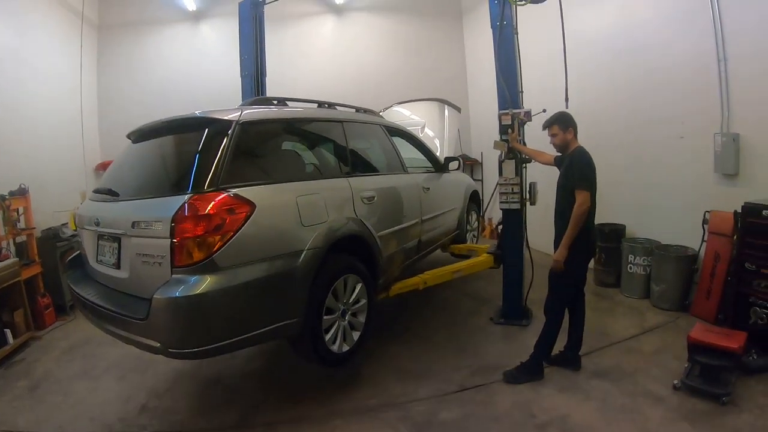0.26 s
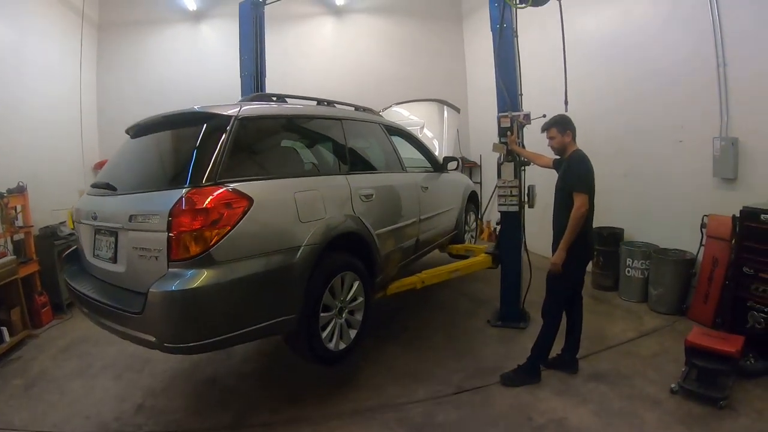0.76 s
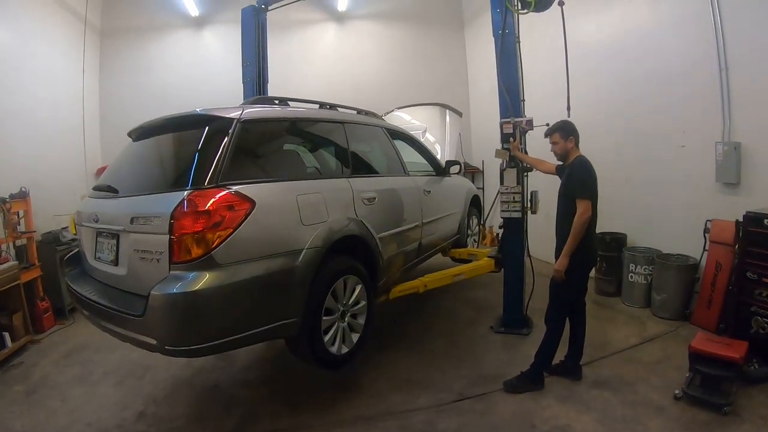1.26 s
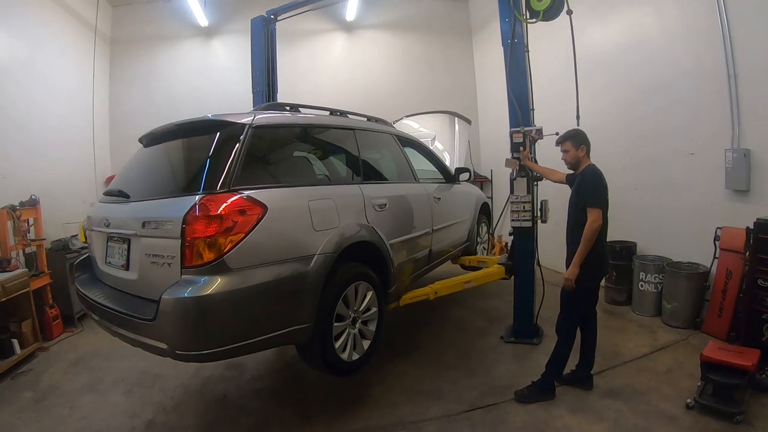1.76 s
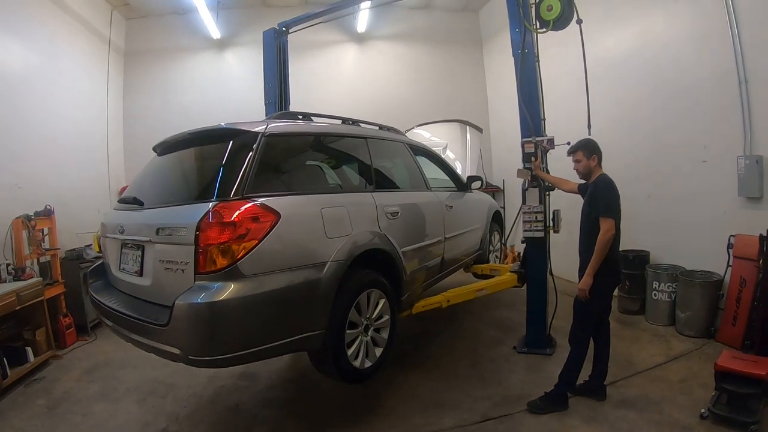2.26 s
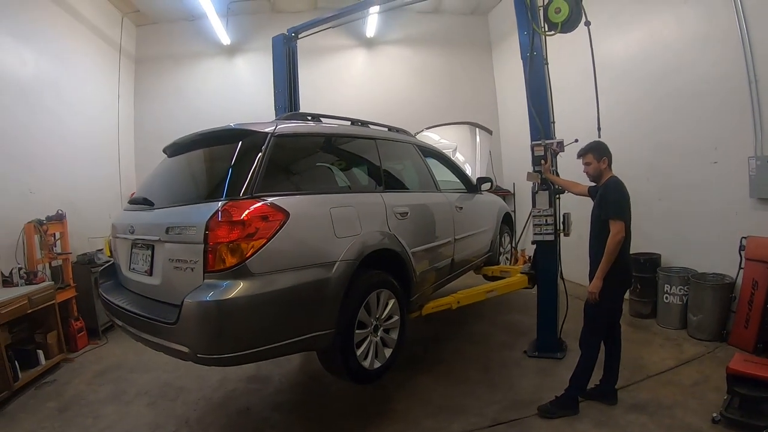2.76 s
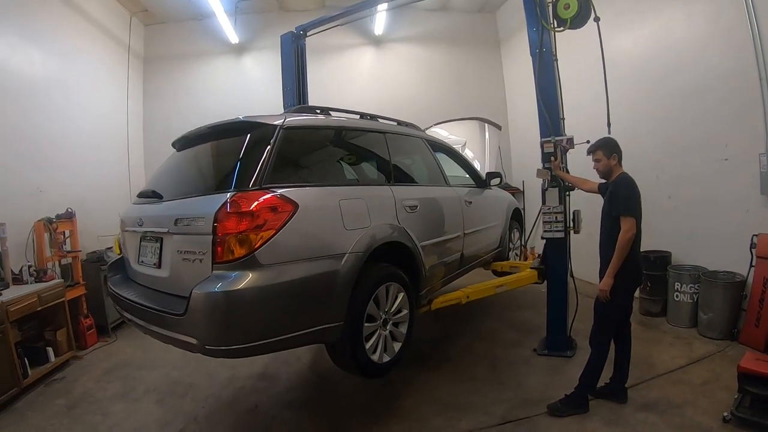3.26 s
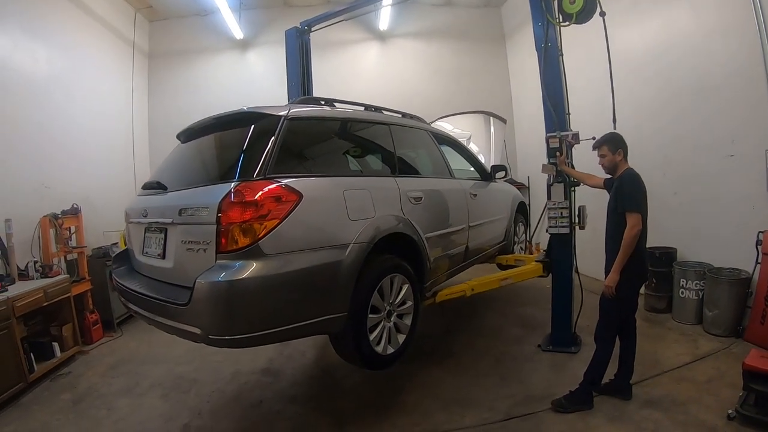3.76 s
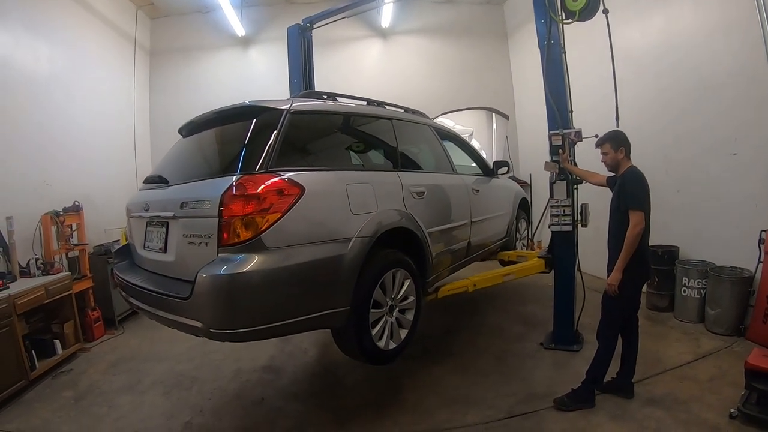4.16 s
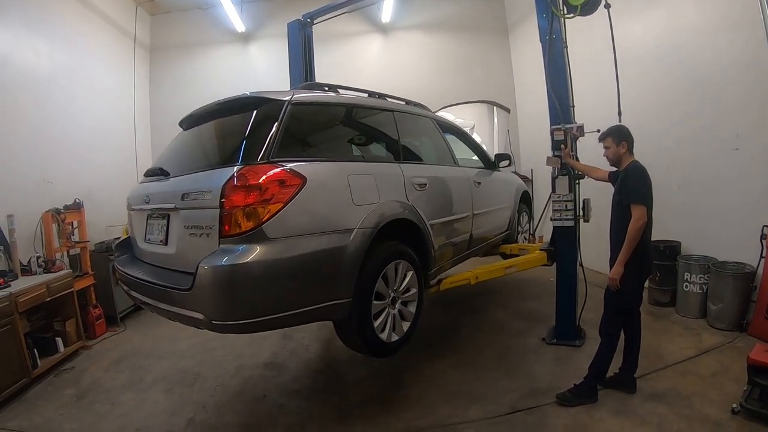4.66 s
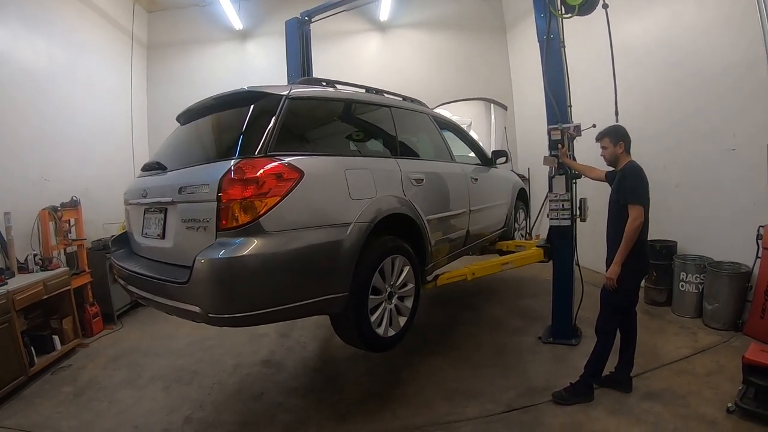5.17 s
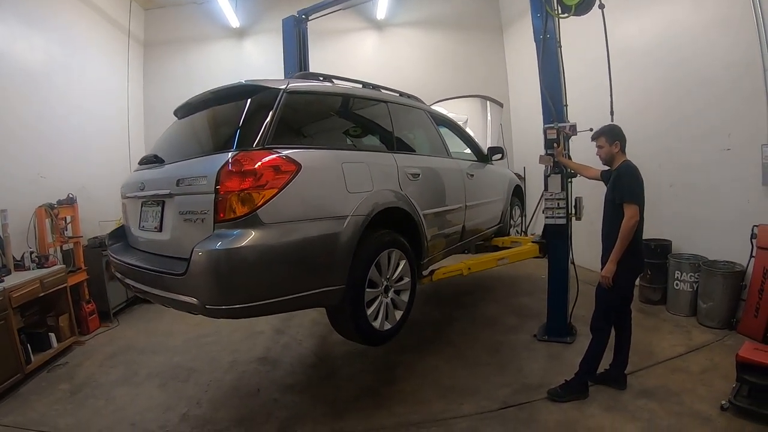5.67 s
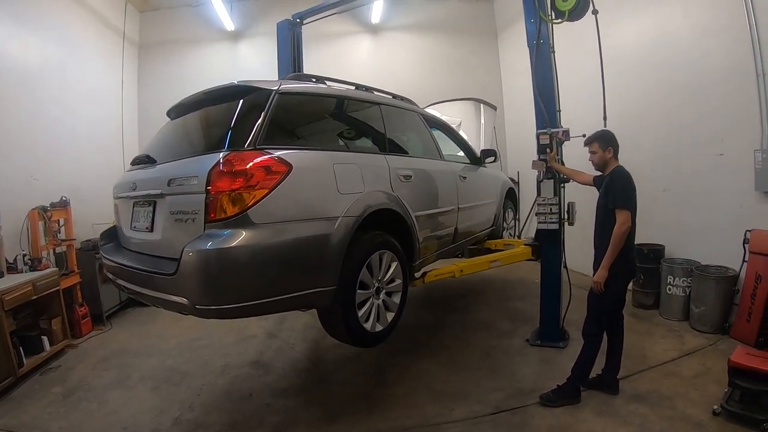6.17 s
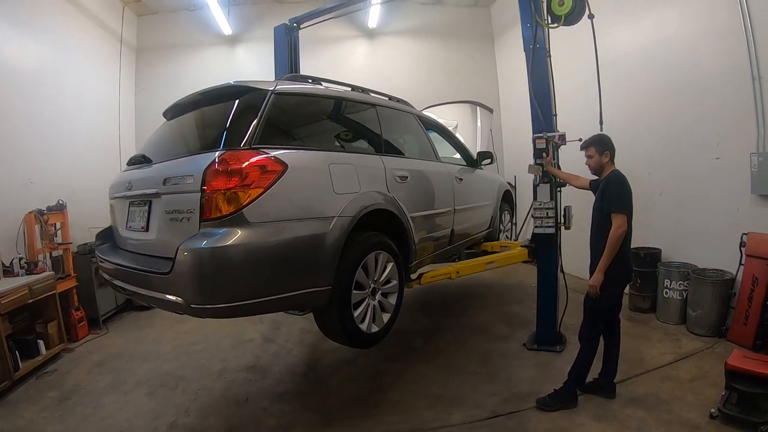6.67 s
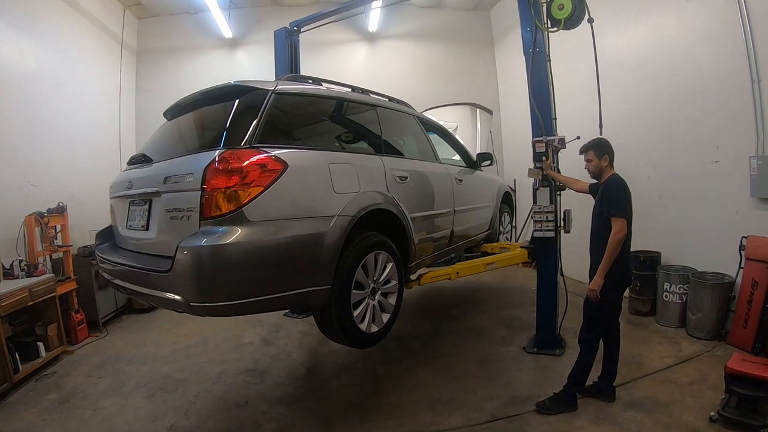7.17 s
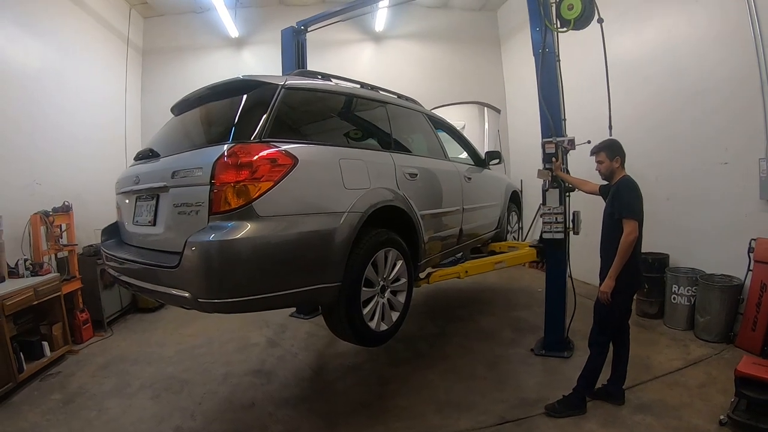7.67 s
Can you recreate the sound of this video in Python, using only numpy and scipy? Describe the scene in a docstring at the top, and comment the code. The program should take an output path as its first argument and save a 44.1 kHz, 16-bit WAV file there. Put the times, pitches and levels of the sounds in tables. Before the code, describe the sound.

Steady motor hum, buzzing gear whine and oil hiss, broken four times by loud double metallic clanks ringing in a bare room.

```python
"""In a small, hard-walled garage a two-post lift raises a car.
The motor hums in pure tones over a rumble; its 13-tooth gear pump whines and buzzes, over hissing oil.
About every 2.3 s the safety latches drop into the next notch: noise bursts and ringing tones make the clang.
The microphone is carried slowly through the room's standing waves, so the tones change in level.
Its gain control turns the sound down after every clang and then lets it creep back."""
import sys
import numpy as np
from scipy import signal
from scipy.fft import rfft, irfft, next_fast_len
from scipy.io import wavfile
from scipy.ndimage import uniform_filter1d, minimum_filter1d, map_coordinates

SR = 44100
rng = np.random.default_rng(int(sys.argv[2]) if len(sys.argv) > 2 else 0)


def master_out(mix):
    """Clip the mix to full scale and print it as 16-bit PCM to the path in sys.argv[1]."""
    frames = np.transpose(np.atleast_2d(mix))
    ceiling = np.clip(frames, -1, 1)
    pcm = np.round(ceiling * 32767).astype(np.int16)
    wavfile.write(sys.argv[1], SR, pcm)


N = 349253
TIME = np.arange(N) / SR

SHAFT_HZ, MAINS_HZ = 58.235, 59.96
TEETH = 13
CUTOFF_HZ = 15600   # the buzz has no lines above this

# how alike left and right are, from 1 (the same) to -1 (opposite): [f/Hz, correlation]
LIKENESS = [(30, 0.43), (70, .85), (120, 1), (380, .95), (700, 0.4), (1300, 0.17), (2400, 0.71),
            (4400, 0.53), (8000, -0.26), (15000, 0.14)]
# weaker tones of the meshing teeth, before they fade and flutter:
# [multiple of the tooth rate, level/dB at the first spot, level/dB at the second spot]
WHINE = [(4, -54, -56.5), (5, -53, -49.5), (6, -56.5, -53.5), (7, -61, -56)]


def from_db(db):
    """Turn decibels into a gain."""
    return 10 ** (np.asarray(db) / 20)


def in_time(rows, s=TIME):
    """Read each column of a curve at the times s."""
    at, *columns = np.transpose(rows)
    return [np.interp(s, at, column) for column in columns]


def at_hz(points, hz, axis=1):
    """Read one column of a spectrum on a log-frequency axis."""
    points = np.array(points, float)
    return np.interp(np.log(np.maximum(hz, 1)), np.log(points[:, 0]), points[:, axis])


def on_the_walk(first_db, second_db):
    """Change a level as the microphone is carried from the first spot to the second."""
    # progress of the walk: [t/s, share of the way]
    walk = [(1.0, 0.02), (3.3, 1)]
    way, = in_time(walk)
    return first_db + (second_db - first_db) * way


def drift(rate, count=1):
    """Slow random curves of spread 1, a point every 10 ms; a higher rate (Hz) wanders faster."""
    r = np.exp(-2 * np.pi * rate / 100)
    white = rng.standard_normal((count, N * 100 // SR + 602))
    slow = signal.lfilter([1], [1, -2 * r, r * r], white)[:, 600:]   # drop the filter's start
    return slow / np.std(slow)


def smooth(points):
    """Stretch a slow curve over every sample."""
    return np.interp(np.linspace(0, len(points) - 1, N), np.arange(len(points)), points)


def pair(mid, side, hz):
    """Make left and right from two unrelated parts, as alike as the room makes them at hz."""
    alike = np.clip(at_hz(LIKENESS, hz), -.99, .995)
    mid = np.sqrt((1 + alike) / 2) * mid
    side = np.sqrt((1 - alike) / 2) * side
    return np.array([mid + side, mid - side])


def noise(spectrum, size=N):
    """Stereo noise shaped by a spectrum in dB per Hz."""
    padded = next_fast_len(size, True)
    hz = np.fft.rfftfreq(padded, 1 / SR)
    white = rfft(rng.standard_normal((2, padded))) * np.sqrt(SR / 2)
    return irfft(pair(*white, hz) * from_db(at_hz(spectrum, hz)), padded)[:, :size]


def band(low, high, size):
    """Stereo noise of average strength (rms) 1 between two frequencies."""
    bandpass = signal.butter(3, [low, min(high, .45 * SR)], "band", fs=SR, output="sos")
    x = signal.sosfilt(bandpass, rng.standard_normal((2, size + 4000)))
    return pair(*(x / np.std(x))[:, -size:], np.sqrt(low * high))


def dying(t, t60):
    """A decay of 60 dB in t60 seconds."""
    return np.exp(-np.log(1000) * t / t60)


def add(out, s, sound):
    """Mix a sound in at time s."""
    start = max(round(s * SR), 0)
    out[:, start:start + sound.shape[1]] += sound[:, :N - start]


def placed(x, right_db):
    """Shift a source to the right by making the right channel right_db louder than the left."""
    return x * from_db(np.array([[-right_db], [right_db]]) / 2)


def room_paths(hz, direct, rate):
    """Gain of steady tones: a fixed part plus reflections that shift as the microphone moves."""
    # complex numbers hold strength and phase: (channel, line, time)
    parts = drift(rate, count=4 * len(hz)).reshape(2, 2, len(hz), -1)
    reflected = pair(*(parts[0] + 1j * parts[1]) / np.sqrt(2), hz[:, None])
    apart = np.arccos(np.clip(at_hz(LIKENESS, hz), -1, 1)) / 2   # phase offset of each channel
    steady = np.exp(1j * (2 * np.pi * rng.random(len(hz)) + np.array([apart, -apart])))
    direct = np.clip(direct, 0, 1)   # share of the power in the fixed part
    return np.sqrt(direct) * steady[:, :, None] + np.sqrt(1 - direct) * reflected


def tone(hz, cycles, direct, rate):
    """One tone of average strength (rms) about 1 as it arrives through the room."""
    path = np.array([smooth(side[0]) for side in room_paths(np.array([hz]), direct, rate)])
    return np.sqrt(2) * np.real(path * np.exp(2j * np.pi * cycles))


def motor(fade_db=2.0, rumble_follows=0.71):
    """Magnetic hum at twice the mains rate, with slowly fading overtones, over a rumble that follows it."""
    # the hum in the room's standing wave, before placing: [t/s, level/dB]
    hum_curve = [(0, -31), (1, -31.5), (2, -34), (5.6, -36), (7, -29.7), (7.9, -31)]
    # overtones, before they fade: [multiple of the hum, level/dB at first spot, level/dB at second spot]
    hum_overtones = [(2, -48, -61), (3, -61, -53.5), (4, -50.5, -55.5), (5, -48.5, -54.5)]
    # low rumble of the running machine, before its level moves: [f/Hz, level/(dB per Hz)]
    rumble_spectrum = [(20, -89), (35, -94), (55, -69), (72, -67), (100, -70), (160, -84.5), (400, -130)]

    hum_db, = in_time(hum_curve)
    hz = 2 * MAINS_HZ
    hum = from_db(hum_db) * np.sqrt(2) * np.sin(2 * np.pi * hz * TIME)
    rumble_db = on_the_walk(4, -1) + rumble_follows * (hum_db - hum_db.mean())
    out = hum + from_db(rumble_db) * noise(rumble_spectrum)
    for k, first_db, second_db in hum_overtones:
        level_db = on_the_walk(first_db, second_db) + fade_db * smooth(drift(0.65)[0])
        out += from_db(level_db) * tone(k * hz, k * hz * TIME, direct=1.0, rate=1.0)
    return out


def gear_whine(turns, flutter_db=1.0, fade_db=1.8, throb=0.074):
    """Tones of the meshing teeth swell in the room, flutter with oil pressure and throb with torque."""
    # whine at once, twice and three times the tooth rate, before flutter: [t/s, level/dB]
    tooth_curve = [(0, -50), (3.7, -56.5), (4.7, -44), (6.7, -53.5), (7.9, -43)]
    lower_curve = [(0, -49), (1.3, -45), (2, -54), (3.3, -42), (4.15, -45.5), (4.5, -50), (5.9, -51.5),
                   (6.6, -45.5), (7.9, -44)]   # a fifth below the main whine
    main_curve = [(0, -39.5), (1, -41), (1.8, -39.5), (2.3, -47.5), (3.3, -35.5), (4.4, -36), (5.4, -40),
                  (6.25, -34.5), (6.9, -45), (7.9, -47)]

    curves = (tooth_curve, lower_curve, main_curve)
    levels = {k: in_time(curve)[0] for k, curve in enumerate(curves, 1)}
    for k, first_db, second_db in WHINE:
        levels[k] = on_the_walk(first_db, second_db) + fade_db * smooth(drift(1.0)[0])
    out = 0
    for k, level_db in levels.items():
        gain = from_db(level_db + flutter_db * smooth(drift(3)[0]))
        out = out + gain * tone(k * TEETH * SHAFT_HZ, k * TEETH * turns, direct=0.98, rate=0.29)
    return out * (1 + throb * np.cos(2 * np.pi * 2 * MAINS_HZ * TIME))


def pump_buzz(turns, size=4096, count=80):
    """No two teeth are alike, so every multiple of the shaft rate sounds, coloured by the housing."""
    # lines of the shaft rate away from any resonance: [f/Hz, level/dB]
    buzz_levels = [(58, -57), (116, -60), (175, -56.5), (400, -67), (1100, -92), (1800, -103), (3000, -78),
                   (4700, -83), (7000, -86), (9500, -65.5), (10500, -74), (11500, -124), (14500, -80),
                   (15500, -105)]
    # resonances of pump housing and oil tank: [f/Hz, width/Hz, level/dB]
    housing = [(290, 70, -67), (669, 69, -52), (799, 38, -54), (2255, 220, -50.5), (3660, 38, -53),
               (5400, 77, -55.5), (6200, 110, -48.5), (6670, 420, -51), (7570, 730, -55), (8380, 270, -54),
               (9000, 240, -59), (9660, 103, -56.5)]
    # higher multiples of the tooth rate: [f/Hz, level/dB]
    whine_top = [(6050, -54), (6800, -43.5), (7600, -49), (8300, -55.5), (9100, -60.5), (9800, -54),
                 (10600, -93), (14300, -88)]

    orders = np.arange(1, int(CUTOFF_HZ / SHAFT_HZ))
    hz = orders * SHAFT_HZ
    power = from_db(at_hz(buzz_levels, hz)) ** 2
    for centre_hz, width_hz, level_db in housing:
        power += (from_db(level_db) / (1 + (2 * (hz - centre_hz) / width_hz) ** 2)) ** 2
    is_tooth = orders % TEETH == 0
    gain = np.where(is_tooth, from_db(at_hz(whine_top, hz)), np.sqrt(power))
    gain[is_tooth & (orders <= TEETH * WHINE[-1][0])] = 0   # these sound in the gear whine
    paths = room_paths(hz, direct=0.32, rate=0.69)
    moments = np.linspace(0, paths.shape[2] - 1, count).astype(int)
    lines = gain[:, None] * paths[:, :, moments]
    # the pressure over one revolution, changing slowly, is read off at the shaft angle
    revolution = irfft(np.pad(lines, ((0, 0), (1, 0), (0, 0))), size, axis=1) * size / np.sqrt(2)
    where = [turns % 1 * size, np.linspace(0, count - 1, N)]
    return np.array([map_coordinates(side, where, order=1, mode="grid-wrap") for side in revolution])


def pump(sway=0.000119, shudder=0.00018):
    """The gear pump: whine and buzz from one slightly unsteady shaft, plus the hiss of oil and fan."""
    # oil flow and motor fan, before placing: [f/Hz, level/(dB per Hz)]
    flow = [(100, -81), (200, -76), (400, -82.5), (700, -79), (1100, -87.5), (1600, -83.5), (2300, -87),
            (3000, -87), (5000, -88.5), (6700, -81), (9500, -92), (11500, -108), (14500, -108),
            (16000, -128)]
    speed = SHAFT_HZ * (1 + sway * smooth(drift(0.61)[0]) + shudder * smooth(drift(23)[0]))
    # a single-phase motor's torque throbs at twice the mains rate: side tones around every line
    throb = .0011 * np.sin(2 * np.pi * 2 * MAINS_HZ * TIME)
    turns = np.cumsum(speed) / SR + throb
    return gear_whine(turns) + pump_buzz(turns) + noise(flow)


def bumps():
    """Soft scuffs and bumps around the lift: bands of noise that rise, die away and end by 0.5 s."""
    # [t/s, level/dB before shaping, centre f/Hz, width/octaves, rise/s, t60/s]
    bump_list = [(0.039, -31.5, 1260, 0.89, 0.031, 0.34), (2.338, -33.5, 270, 1.6, 0.0024, 0.11),
                 (2.338, -43, 1800, 2.1, .002, 0.088), (2.356, -36.5, 706, 3.7, 0.0018, 0.81),
                 (2.359, -33, 197, 0.92, 0.0035, .15), (4.57, -45, 2250, 1.4, 0.025, 1.1),
                 (7.706, -29.5, 59.3, 2, 0.0063, 0.21)]
    out, t = np.zeros((2, N)), TIME[:SR // 2]
    for s, level_db, hz, octaves, rise, t60 in bump_list:
        shape = np.minimum(t / rise, 1) * dying(np.maximum(t - rise, 0), t60)
        half_width = 2 ** (octaves / 2)
        add(out, s, from_db(level_db) * band(hz / half_width, hz * half_width, len(t)) * shape)
    return out


def contacts():
    """At each notch both latches drop and bounce once, then a last contact settles them."""
    # the carriage passes a notch:
    # [t/s of the first latch's drop, its extra level/dB, lag/s of the second latch, its extra level/dB]
    notches = [(0.2216, 0.5, 0.11, 0.5), (2.5126, 0.5, .116, 0.5), (4.8149, -.5, .059, 0),
               (7.0865, 0, .075, 1)]
    # gains of clang, thump and crack in dB
    first_drop, second_drop, settling = (0.55, .5, 2.1), (2.2, -3.5, 2.5), (0, -19, -7)
    rebound_loss_db = (2.5, 3.5, 6)
    rebound_s, settle_s = .037, .118   # delay after the drop, and after the second drop

    # each contact: (time, post, whether it opens the clatter, gains in dB)
    for s, first_db, lag, second_db in notches:
        drops = [(s, np.add(first_drop, first_db)), (s + lag, np.add(second_drop, second_db))]
        for post, (when, levels_db) in enumerate(drops):
            yield when, post, post == 0, levels_db
            yield when + rebound_s * rng.uniform(.9, 1.1), post, False, levels_db - rebound_loss_db
        yield s + lag + settle_s, 0, False, np.array(settling)


def ringing(modes, t, scatter_db):
    """Struck modes: dying pure tones, each with a random strength and phase."""
    out = 0
    for hz, level_db, t60 in modes:
        phase = np.angle(pair(*np.exp(2j * np.pi * rng.random((2, 1))), hz))
        gain = from_db(level_db + scatter_db * rng.normal())
        out = out + gain * dying(t, t60) * np.sin(2 * np.pi * hz * t + phase)
    return out


def clang(t, swell=0.17, swell_hz=2850, swell_octaves=1.0):
    """Noise bands stand for countless post modes and echoes; those near swell_hz build up late."""
    # dense ringing of a steel post, before each contact's gain: [f/Hz, level/(dB per Hz), t60/s]
    dense_ringing = [(185, -59.5, 0.35), (342, -56.5, 1.06), (480, -59.5, 0.51), (790, -59.5, 1.15),
                     (1450, -55, 1.17), (1710, -56.5, 1.09), (1960, -51, 1.03), (2880, -45.5, 0.97),
                     (3880, -54, 1.12), (5000, -52.5, 0.95), (6200, -56, 0.71), (8400, -66.5, 0.8),
                     (9700, -72.5, 0.17), (10350, -90, 0.2)]
    edges = np.geomspace(160, 15000, 31)
    out = 0
    for low, high in zip(edges, edges[1:]):
        hz = np.sqrt(low * high)
        resonant = np.exp(-(np.log2(hz / swell_hz) / swell_octaves) ** 2)
        build_up = 1 - .5 * resonant * np.exp(-t / swell)
        shape = dying(t, at_hz(dense_ringing, hz, axis=2)) * build_up
        gain = from_db(at_hz(dense_ringing, hz)) * np.sqrt(high - low)
        out = out + gain * band(low, high, len(t)) * shape
    return out


def crack(t, rise, t60):
    """Steel on steel: a short burst of noise with a quick rise."""
    # before the burst is shaped and each contact's gain: [f/Hz, level/(dB per Hz)]
    crack_spectrum = [(200, -111), (700, -53.5), (1500, -62.5), (2100, -43), (3000, -53.5), (5000, -53.5),
                      (7000, -55.5), (9700, -68), (11000, -81), (14500, -83), (16000, -110)]
    return noise(crack_spectrum, size=len(t)) * dying(t, t60) * (1 - np.exp(-(t / rise) ** 2))


def chatter(t, level_db=-13, scatter_db=3, span=.3, t60=0.06, count=12):
    """A dropped latch jitters in its notch: small contacts that tend to weaken as it settles."""
    out = np.zeros((2, N))
    for when, strength in zip(rng.random(count), rng.uniform(-1, 1, count)):
        gain = from_db(level_db + scatter_db * strength - 4 * when)
        add(out, .015 + span * when, gain * crack(t[:SR // 20], .0006, t60))
    return out[:, :len(t)]


def latches(crack_t60=0.051, thump_rise=0.00813, first_rise=0.0012, later_rise=0.002, bloom=0.0035):
    """Each contact of latch and post gives a crack, a clang and a thump that swells more slowly."""
    # post modes that stand out of the dense ringing, before scatter and contact gain:
    # [f/Hz, level/dB, t60/s]
    post_modes = [(1973, -35, 1.2), (2092, -37, 1.1), (2573, -36, 1.3), (2672, -35, 1.2), (2794, -34, 1.2),
                  (2918, -34, 1.2), (3450, -39, 1.2), (3564, -39, 1.2), (9720, -49, .4)]
    # bending modes of the post, before the swell and contact gain: [f/Hz, level/dB, t60/s]
    thump_modes = [(238, -24, 0.12), (264, -21.5, 0.22), (295.6, -27, 0.33), (360.7, -43, 0.71)]

    out, t = np.zeros((2, N)), TIME[:3 * SR // 2]
    short = t[:SR // 2]
    posts = [clang(t) + ringing(post_modes, t, scatter_db=2.0) for _ in range(2)]
    bending = 0
    for hz, level_db, t60 in thump_modes:
        wave = np.sin(2 * np.pi * hz * (short - thump_rise))
        bending = bending + from_db(level_db) * dying(short, t60) * wave
    thump = bending[None] * (1 - np.exp(-(short / thump_rise) ** 2))
    for s, post, opens, (clang_db, thump_db, crack_db) in contacts():
        rise = first_rise if opens else later_rise   # the first drop has the hardest attack
        add(out, s, from_db(clang_db) * posts[post] * (1 - np.exp(-t / (rise + bloom))))
        add(out, s, from_db(crack_db) * crack(short, rise, crack_t60))
        add(out, s, from_db(thump_db) * thump)
        if opens:
            add(out, s, chatter(short))
    return out


def scene():
    """The power unit hangs on the right-hand post, so motor and pump lean right; so do the latches."""
    machine = placed(motor(), right_db=0.83) + placed(pump(), right_db=2.5)
    return machine + placed(latches(), right_db=1.5) + bumps()


def gain_control(x, threshold_db=-26, slope=0.55, hold=0.26, release_db=9, attack=0.12):
    """Loud sound turns the gain down; it is held, then creeps back at about release_db a second."""
    power = uniform_filter1d(np.mean(x ** 2, axis=0), size=1300)   # averaged over about 29 ms
    level_db = 10 * np.log10(np.maximum(power, 1e-12))
    cut_db = slope * np.maximum(level_db - threshold_db, 0)
    # hold the deepest cut of the last hold seconds
    half = int(hold * SR / 2)
    cut_db = -minimum_filter1d(-cut_db, 2 * half + 1, origin=half, mode="constant")
    # let it go no faster than release_db a second
    cut_db = np.maximum.accumulate(cut_db + release_db * TIME) - release_db * TIME
    r = np.exp(-1 / (attack * SR))   # smooths every change of gain
    return x * from_db(-signal.lfilter([1 - r], [1, -r], cut_db))


def record(dry):
    """Gain control, then a steep filter cuts the top."""
    lowpass = signal.ellip(10, .1, 80, CUTOFF_HZ - 400, fs=SR, output="sos")
    return signal.sosfilt(lowpass, gain_control(dry))


dry = scene()
out = record(dry)
master_out(out)
```